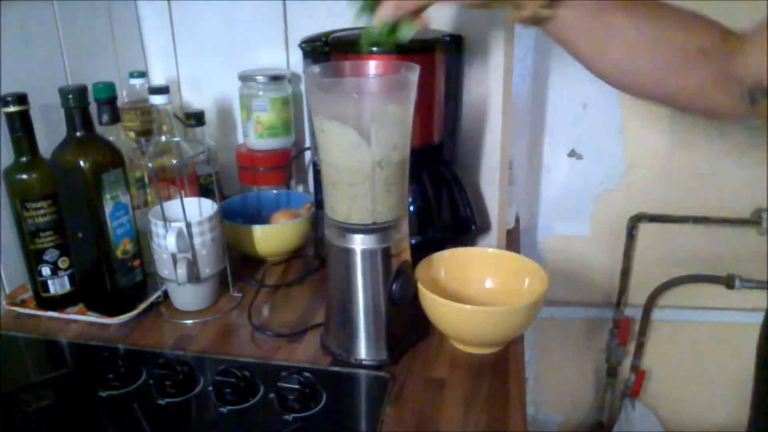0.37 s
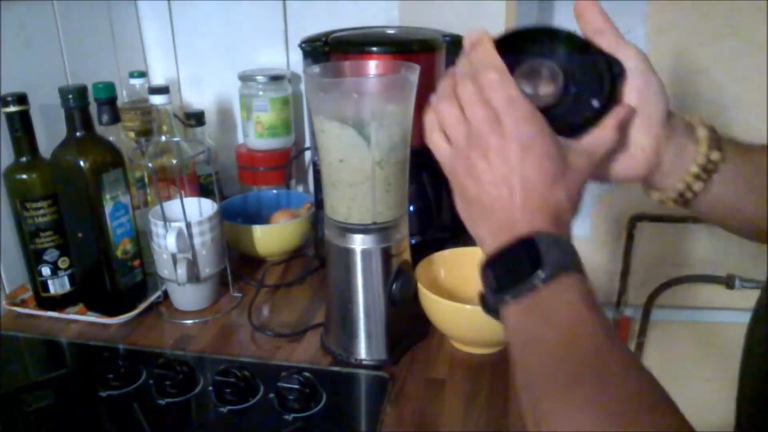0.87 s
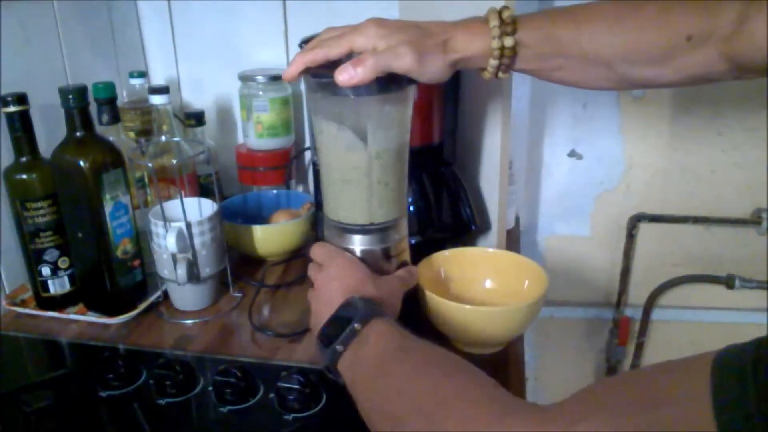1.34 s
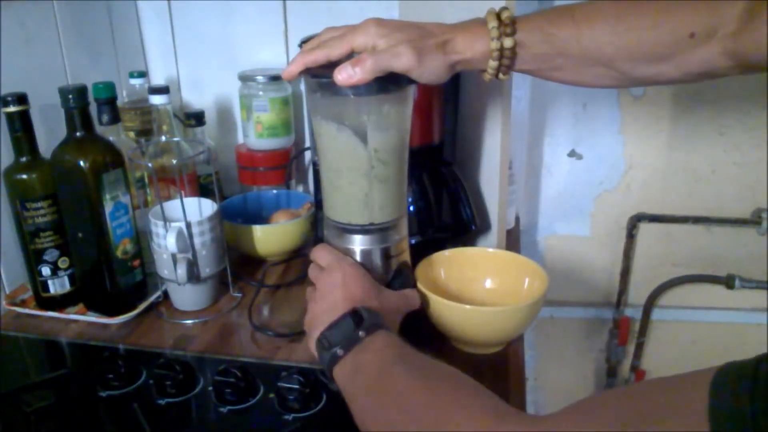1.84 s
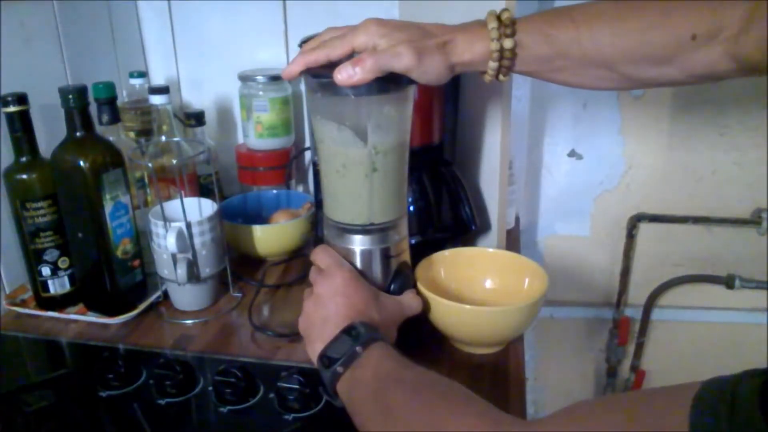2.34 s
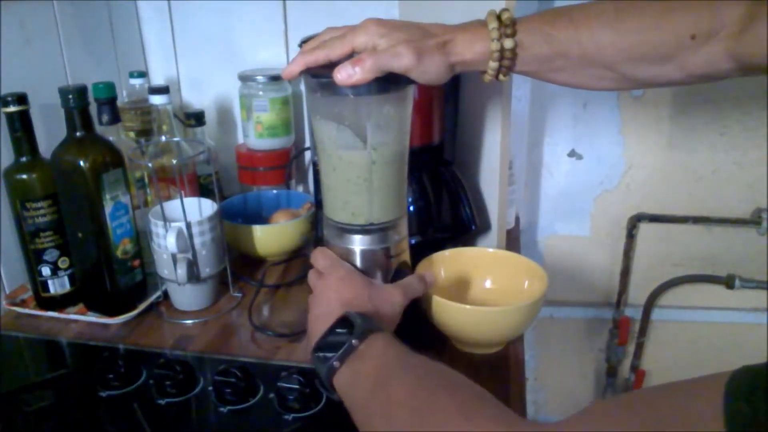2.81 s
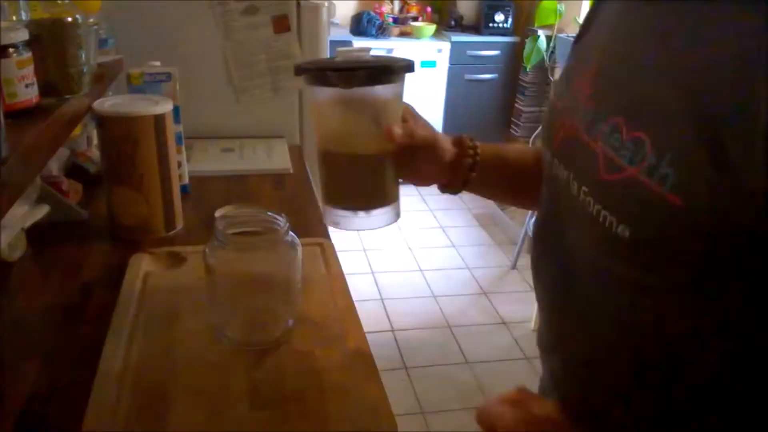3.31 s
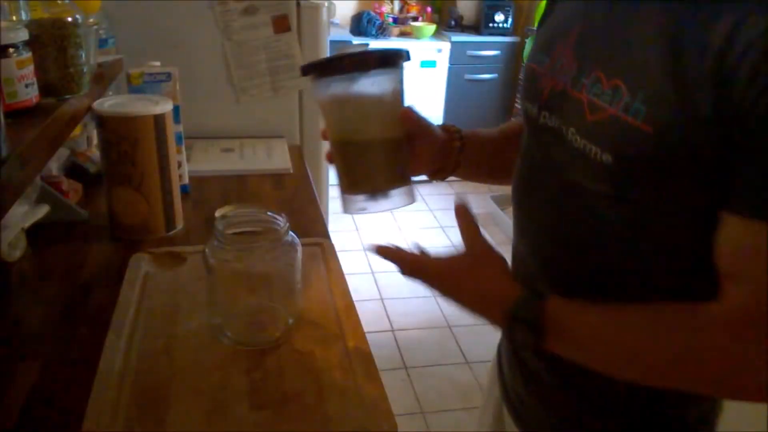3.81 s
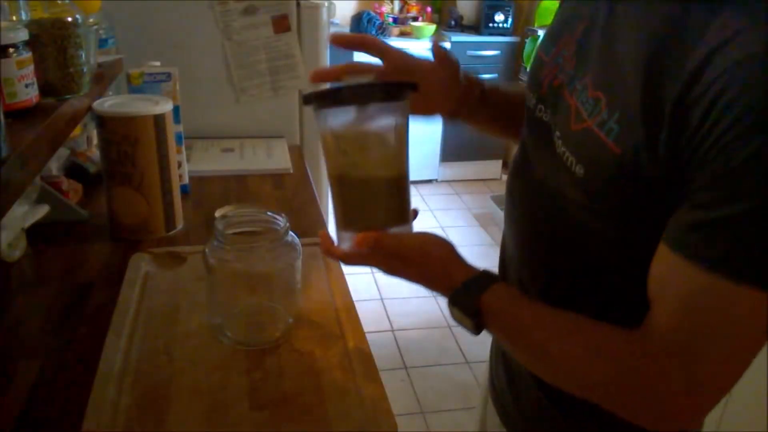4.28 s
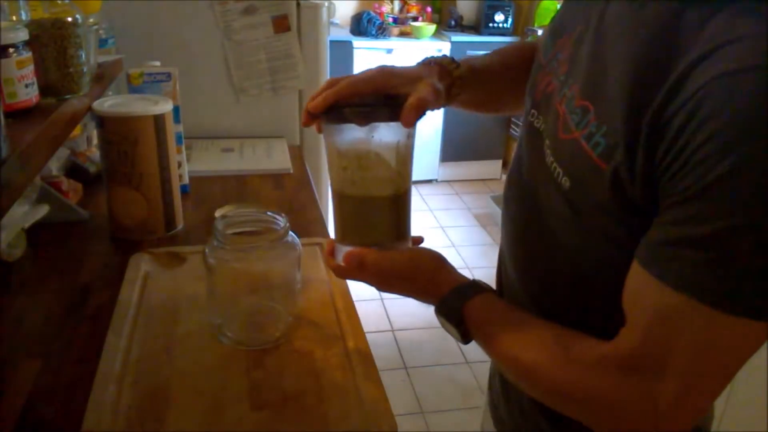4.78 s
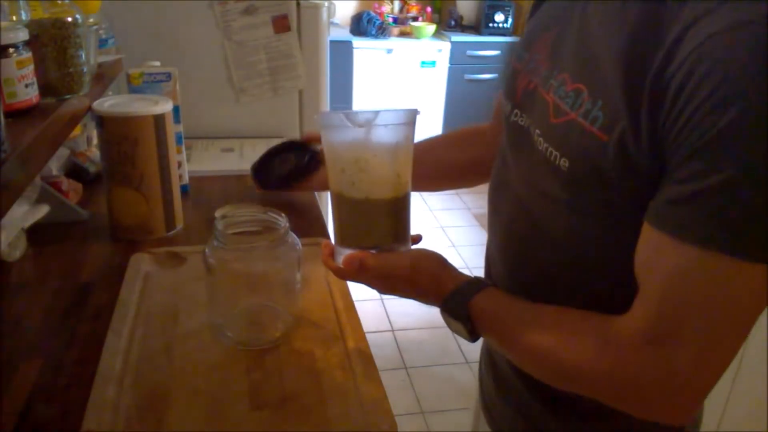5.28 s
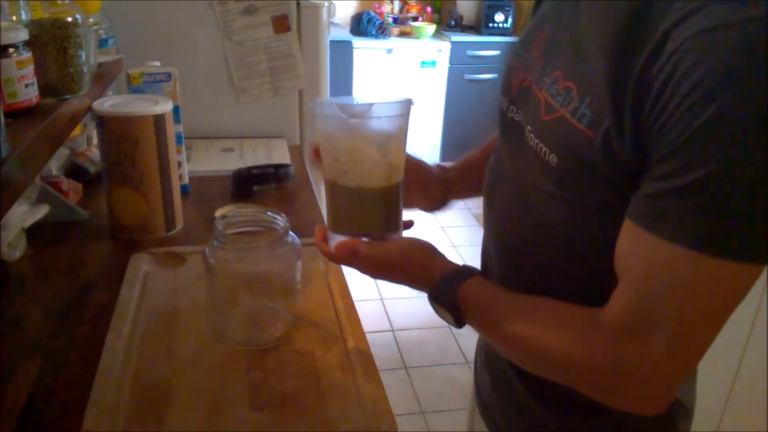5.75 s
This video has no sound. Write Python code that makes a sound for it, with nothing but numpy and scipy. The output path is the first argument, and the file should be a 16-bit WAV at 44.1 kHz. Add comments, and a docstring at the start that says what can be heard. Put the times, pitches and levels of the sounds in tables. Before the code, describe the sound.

Close in a kitchen with a faint refrigerator hum, small nuts tick into a plastic blender jar and its lid claps on hard. The motor roars in a half-second burst, then a longer one with a buzzing whine that sags away. Small clicks follow. After a brief dip to silence, over low rumble, the cup is handled softly, its lid popped off and knocked down on the counter.

```python
"""Small blender and its lid

Nuts drop into a small blender, the lid snaps on and the motor runs in two pulses: shaped noise for
the load, tones for the whirling blades. After a fade through silence, hands lift the plastic lid off
the cup and lay it on the counter. Each blow sets off ringing, a thud and a crack; rustling is grainy noise.
A refrigerator hums in the first part, a low rumble fills the second; both channels are the same.
"""
import sys
import numpy as np
from scipy import signal
from scipy.fft import rfft, irfft
from scipy.io import wavfile
from scipy.ndimage import uniform_filter1d

SR = 44100
rng = np.random.default_rng(int(sys.argv[2]) if len(sys.argv) > 2 else 0)


def volts_from_decibels(level):
    """Turn decibel levels (scalar or array-like) into linear amplitude factors."""
    exponent = np.asarray(level, float) / 20
    return 10 ** exponent


def int16_out(signal):
    """Quantize to a 16-bit WAV file."""
    q = np.round(np.clip(np.atleast_2d(signal).T, -1, 1) * 32767)
    wavfile.write(sys.argv[1], SR, q.astype(np.int16))


N = 259308  # length in samples

# Levels below are those before the fade. Noise colours are relative: their noise is scaled to rms 1.
# refrigerator hum lines: pitch_hz, level_db (rms, before wavering)
HUM = [(86.1, -75.5), (107.7, -67), (188.4, -64)]
# colour of the air in the first part: pitch_hz, level_db (per Hz)
AIR = [(12, -58), (20, -26.5), (42, -24), (85, -6.5), (197, -8), (455, -19), (523, -26.5), (794, -21),
       (965, -27.5), (1050, -22), (1430, -32), (2230, -30), (5000, -41.5), (15700, -40)]
# colour of the rumble in the second part: pitch_hz, level_db (per Hz)
RUMBLE = [(12, -26), (20, -3.5), (59, 9.5), (76, -8.5), (186, -13.5), (253, -16), (481, -23), (1110, -25),
          (1690, -40.5), (2230, -36.5), (3890, -38.5), (5290, -28), (9240, -42), (14000, -37.5),
          (15700, -77)]
# sleeve, skin and nuts rustling in soft swells: middle_s, length_s, level_db
RUSTLE = [(.42, 0.14, -74), (0.763, 0.03, -77), (3.521, 0.053, -73.5), (3.922, 0.23, -83),
          (4.088, 0.068, -68), (5.358, 0.15, -87)]
# blows on jar, cup and lid (1.284 s is the button's click): start_s, level_db, struck_hz (pitch struck most), #
# thud_db and crack_db (both over level_db)
JAR_BLOWS = [(0.243, -37, 1090, -25, -31), (0.25, -28, 7200, -27, -3), (0.331, -56.5, 1100, -8, -18),
             (0.596, -45, 990, -12, -36), (0.598, -49, 3360, -15, -37), (0.876, -38, 4700, -23, -3.5),
             (0.927, -52, 4620, -17, -5), (1.081, -19.5, 2600, -29, -9), (1.087, -15, 2260, -31, -18.5),
             (1.112, -23, 2500, -22.5, -17.5), (1.127, -15, 1700, -28.5, -15),
             (1.131, -12, 1376, -23.5, -12), (1.19, -39, 1880, -17, -20), (1.21, -27.5, 6600, -10.5, 0.5),
             (1.211, -34.5, 2300, -13, -22), (1.284, -41, 2500, -8.5, -9), (3.046, -58, 3880, -11.5, -9.5),
             (3.107, -58.5, 2500, -6, -14), (3.162, -53, 2500, -9, -11), (3.193, -51.5, 1032, -10, -18.5),
             (3.325, -46, 1840, -4, -9.5)]
CUP_BLOWS = [(3.587, -57, 1080, -14, -35), (3.723, -63, 396, 4, -32), (4.491, -53.5, 600, -2.5, -24),
             (4.512, -56, 781, 2, -16.5), (4.536, -43.5, 538, 0.5, -26), (4.598, -42.5, 770, -16, -19),
             (4.612, -34, 814, -21, -8.5), (4.825, -69, 300, 6, -20), (4.908, -46, 474, -18, -24.5),
             (4.963, -45.5, 640, -14, -27.5)]
LID_BLOWS = [(5.399, -35, 2000, -12, -20.5), (5.42, -27.5, 1480, -20, -21.5),
             (5.574, -19, 1650, -26.5, -24.5), (5.585, -26, 1670, -17, -14.5), (5.594, -22, 1610, -30, -23),
             (5.606, -27.5, 1620, -14, -18.5), (5.663, -29.5, 930, -18, -24),
             (5.678, -26, 1610, -20.5, -27.5), (5.736, -45.5, 1900, -1, -33), (5.755, -47.5, 1870, 0, -41)]
# ways each part can ring: pitch_hz, width_hz (at least a ninth of the pitch is used), level_db (relative)
JAR = [(720, 120, -2), (1080, 120, 0), (1335, 150, 2), (2300, 250, 0), (2600, 290, 0), (3600, 400, -1),
       (4350, 300, 2), (6500, 720, -2), (8200, 900, -3)]
CUP = [(478, 52, 9.5), (567, 220, 14), (709, 370, 10.5), (1006, 420, 6.5), (1438, 1600, 10.5),
       (1970, 150, 3), (2500, 300, -12)]
LID = [(500, 330, 10), (700, 760, 12), (1280, 190, 2.5), (1514, 495, 13), (1864, 190, 7.5), (2017, 380, 6),
       (2500, 480, 12), (2860, 250, 2.5), (4200, 460, 1)]
# what each blow shakes underneath: pitch_hz, level_db (relative)
JAR_THUD = [(180, -4.5), (430, -3)]
CUP_THUD = [(150, 2.5), (230, -5)]
LID_THUD = [(76, -2), (260, -8)]
# each press of the button jolts the resting load: start_s, peak_db (load level)
JOLTS = [(1.299, -15), (1.797, -10.5)]
# the load churning after each jolt, one list a pulse: time_s, load_db, boom_db (over the load)
CHURN = [
    [(1.361, -26, -10), (1.368, -19, -16.5), (1.418, -29.5, -2.5), (1.45, -22.5, -3), (1.48, -22.5, 2.5),
     (1.522, -23.5, -8), (1.758, -23.5, -6.5), (1.788, -47.5, 2), (1.8, -45, -4)],
    [(1.84, -30.5, -10), (1.895, -17, -11), (1.916, -23, -14), (1.95, -22, -8), (2.11, -25, -7.5),
     (2.488, -25, -6.5), (2.806, -26.5, -9), (2.844, -43, -5), (2.866, -48, 13.5), (2.88, -78, 8)],
]
# colour of the roar and its boom: pitch_hz, level_db (per Hz)
ROAR = [(140, -49), (230, -19.5), (292, -26), (398, 0), (469, -1.5), (544, -1), (915, -18), (1330, -7),
        (1950, -8.5), (2510, -2.5), (2830, -10.5), (4100, -7.5), (4900, -9), (5690, -20.5), (8000, -24),
        (10400, -40), (17600, -120)]
# colour of the fine spray: pitch_hz, level_db (per Hz)
SPRAY = [(3240, -29), (5500, -5.5), (5870, -5), (6880, -2), (7410, -4.5), (7990, -2), (8610, -3.5),
         (12200, -5), (13300, -4.5), (15700, -6)]
# the churning noise thins briefly: middle_s, length_s, level_db
THINS = [(2.072, .027, -20), (2.648, .027, -20)]
# pitch of the passing blades at full speed, sagging with the load: time_s, pitch_hz
WHINE = [(1.94, 570.1), (1.952, 593.2), (1.982, 604.1), (2.004, 681.4), (2.054, 634.0), (2.08, 678.2),
         (2.124, 643.4), (2.138, 657.7), (2.184, 627.8), (2.218, 682.2), (2.394, 638.3), (2.422, 654.5),
         (2.456, 640.8), (2.584, 673.1), (2.616, 652.6), (2.682, 666.6), (2.738, 656.4), (2.815, 685.5)]
# tones above and including the blade pitch: multiple, level_db (over the whine)
OVERTONES = [(1, 0), (2, -4), (3, 1.5), (4, -9), (5, -10), (6, -5), (7, -5.5), (8, -5.5)]
# housing that sings at full speed: pitch_hz, width_hz, level_db (over the whine, 3 dB added later)
HOUSING = [(4066, 120, -3.5), (4735, 130, -7), (5344, 90, -11), (6830, 400, -7.5), (7750, 80, -14),
           (13400, 800, -8)]
# motor tones of steady average pitch: pitch_hz, level_db (rms, before wavering)
BUZZ = [(2399, -52), (2800, -55.5), (3199, -48), (4750, -50), (5240, -45)]
# fade through silence: time_s, level_db
FADE = [(3.332, -1), (3.36, -27.5), (3.375, -58), (3.385, -57.5), (3.42, -7), (3.499, 2)]


def evened(x):
    """Scales to rms 1."""
    return x / np.sqrt(np.mean(x ** 2) + 1e-20)


def read(points, hz):
    """Reads a spectrum on a log-frequency axis."""
    f, value = np.transpose(points)
    return np.interp(np.log(hz + 1), np.log(f + 1), value)


def add(mix, s, sound):
    """Mixes a sound in from time s."""
    part = mix[round(s * SR):][:len(sound)]
    part += sound[:len(part)]


def band(x, low_hz, high_hz, order=2):
    """Keeps the pitches between two edges."""
    edges = [low_hz, min(high_hz, SR / 2 - 2000)]
    return signal.sosfilt(signal.butter(order, edges, "band", fs=SR, output="sos"), x)


def resonate(x, hz, width):
    """Rings at one pitch, with gain 1 there; a wider resonance dies sooner."""
    return signal.lfilter(*signal.iirpeak(hz, hz / width, SR), x)


def slow(size, seconds):
    """Smooth random wavering of rms 1."""
    span = int(seconds * SR)
    once = uniform_filter1d(rng.standard_normal(size), span)
    return evened(uniform_filter1d(once, span))


def noise(colour_db, patchy_db, size=1024):
    """Noise of a given colour, built from short random spectra with drifting patches."""
    hz = np.fft.rfftfreq(size, 1 / SR)
    a, b, patches = rng.standard_normal((N * 4 // size + 5, len(hz), 3)).T
    patches = uniform_filter1d(patches, 9, 0)  # smooth over pitch
    patches = evened(uniform_filter1d(patches, 7, 1))  # smooth over time
    spectra = (a + 1j * b) * volts_from_decibels(colour_db(hz)[:, None] + patchy_db * patches)
    sound = signal.istft(spectra, nperseg=size, noverlap=size - size // 4)[1]
    return evened(sound[:N])


def fridge():
    """Steady compressor tones that waver in strength and timing, over the noise of the room air."""
    t = np.arange(N) / SR
    lines = np.zeros(N)
    for hz, db in HUM:
        turns = hz * t + 0.06 * slow(N, 0.08)
        lines += volts_from_decibels(db + 0.89 * slow(N, 0.074)) * np.sin(2 * np.pi * turns)
    air = noise(lambda hz: read(AIR, hz), patchy_db=3.0, size=2048)
    return np.sqrt(2) * lines + volts_from_decibels(-64.5) * air


def rustle():
    """Soft friction noise with a fine grain: swells over a faint steady rub."""
    t = np.arange(N) / SR
    rub_db = -82
    level = volts_from_decibels(rub_db)
    for s, length, db in RUSTLE:
        level = level + volts_from_decibels(db) * np.exp(-(2 * (t - s) / length) ** 2)
    grain = volts_from_decibels(2.5 * slow(N, 0.002))
    return level * evened(band(rng.standard_normal(N), 980, 4700) * grain)


def blow(row, modes, thuds, t60, top_hz, hit_s, room_db, room_hz, spread_db, tick_db, clatter_db):
    """A short contact and its duller room echoes drive the ringing near the pitch struck, a thud and a crack."""
    s, level_db, struck_hz, thud_db, crack_db = row
    t = np.arange(SR // 2) / SR
    a, b, c, d = rng.standard_normal((4, len(t)))
    contact = np.exp(-t / hit_s)
    fall_db = -60 * t / max(t60, 0.01)  # echoes lose 60 dB in t60 seconds
    echo = volts_from_decibels(room_db + fall_db)
    drive = a * contact + band(d, 300, room_hz, order=4) * echo

    ring = np.zeros(len(t))
    for hz, width, db in modes:
        width = max(width, hz / 9)  # plastic damps every mode
        near_db = db - spread_db * np.log2(hz / struck_hz) ** 2  # weaker away from the pitch struck
        ring += volts_from_decibels(near_db) * resonate(resonate(drive, hz, width), hz, width) * np.sqrt(1000 / width)
    body = ring / abs(ring).max() + volts_from_decibels(clatter_db) * drive
    # a soft blow reaches only modes near its own pitch
    body = band(body, struck_hz / 4, struck_hz * 3.2, order=3)

    shaken = evened(sum(volts_from_decibels(db) * resonate(resonate(b, hz, hz / 2), hz, hz / 2) for hz, db in thuds))
    thud = shaken * volts_from_decibels(thud_db) * (np.exp(-t / (3 * hit_s)) + echo)

    tick = volts_from_decibels(tick_db + fall_db) * band(c, 7500, 16500)
    treble = evened(band(c, 2800, top_hz, order=4)) + tick
    crack = treble * volts_from_decibels(crack_db) * (contact + echo)
    return s, volts_from_decibels(level_db) * (body + thud + crack)


def jar_blow(row):
    """A blow on the jar, or the click of the button just before the motor starts: short contact, bright crack
    and ringing close to the pitch struck."""
    return blow(row, JAR, JAR_THUD, t60=0.073, top_hz=13000, hit_s=0.0036, room_db=-9.5, room_hz=8050,
                spread_db=22, tick_db=-6.5, clatter_db=-15)


def thinning(t):
    """Gain of the brief dips in the churning noise."""
    return volts_from_decibels(sum(db * np.exp(-(2 * (t - at) / length) ** 6) for at, length, db in THINS))


def churn():
    """Liquid and pieces thrown round the jar: roar, a boomy air cavity, fine spray, the base shaking."""
    jolt_start_db, jolt_rise_s, jolt_fall_db_per_s = -12, 0.027, 619
    jolt_boom_db, jolt_spray_db, jolt_shake_db = -11.5, -13.5, -36  # over the jolt
    # over the load, one end value a pulse: spray grows as the load is flung higher,
    # the base shakes less once the blades turn freely
    spray_from_db, spray_to_db = -13, [-5.5, -2]
    shake_from_db, shake_to_db = -16.5, [-25.5, -29]
    settle_s = 0.13
    # spray loses this much more for every dB that the load sinks under churning_db
    churning_db, coast_spray_share = -28, 0.51

    t = np.arange(N) / SR
    grit = volts_from_decibels(0.76 * slow(N, 0.0011))  # pieces striking blades and wall make the noise lumpy
    full = rfft(noise(lambda hz: read(ROAR, hz), patchy_db=3.0) * grit)
    low = 1 / (1 + (np.fft.rfftfreq(N, 1 / SR) / 800) ** 8)  # boom below 800 Hz, roar above
    boom = evened(irfft(full * low, N))
    roar = evened(irfft(full * (1 - low), N))
    spray = noise(lambda hz: read(SPRAY, hz), patchy_db=2.0)
    shake = evened(band(rng.standard_normal(N), 150, 210))

    out = np.zeros(N)
    for (on, jolt_db), rows, spray_end_db, shake_end_db in zip(JOLTS, CHURN, spray_to_db, shake_to_db):
        since = np.maximum(t - on, 0)
        rise_db = jolt_start_db * (1 - since / jolt_rise_s)
        drop_db = -jolt_fall_db_per_s * (since - jolt_rise_s)
        kick = (t > on) * volts_from_decibels(jolt_db + np.minimum(rise_db, drop_db))

        s, row_load_db, row_boom_db = np.transpose(rows)
        load_db = np.interp(t, s, row_load_db, -150, -150)
        load = volts_from_decibels(load_db)
        fresh = np.exp(-since / settle_s)  # fades from 1 as the load settles
        coast_db = coast_spray_share * np.minimum(load_db - churning_db, 0)
        boom_db = np.interp(t, s, row_boom_db)
        spray_db = coast_db + spray_end_db + (spray_from_db - spray_end_db) * fresh
        shake_db = shake_end_db + (shake_from_db - shake_end_db) * fresh

        # hypot joins jolt and load by power
        out += np.hypot(kick, load) * volts_from_decibels(-3.5) * roar
        out += np.hypot(kick * volts_from_decibels(jolt_boom_db), load * volts_from_decibels(boom_db)) * boom
        out += np.hypot(kick * volts_from_decibels(jolt_spray_db), load * volts_from_decibels(spray_db)) * spray
        out += np.hypot(kick * volts_from_decibels(jolt_shake_db), load * volts_from_decibels(shake_db)) * shake
    return out * thinning(t)


def whine():
    """Blade tone and overtones, shaken and blurred by the uneven load, with singing housing and motor buzz."""
    whine_db, edge_s = -33, 0.02
    s, speed_hz = np.transpose(WHINE)
    t = np.arange(s[0], s[-1], 1 / SR)
    size = len(t)
    shaking = 1 + 0.003 * slow(size, 0.004) + 0.006 * slow(size, 0.014)
    turns = np.cumsum(np.interp(t, s, speed_hz) * shaking) / SR

    tones = np.zeros(size)
    for k, db in OVERTONES:
        slip = 0.0003 * k ** 2 * slow(size, 0.003)  # blurs high overtones most
        tones += volts_from_decibels(db + 2.0 * slow(size, 0.016)) * np.sin(2 * np.pi * k * (turns + slip))

    air = rng.standard_normal(size)
    for hz, width, db in HOUSING:
        tones += volts_from_decibels(db) * evened(resonate(resonate(air, hz, width), hz, width))

    buzz = np.zeros(size)
    for hz, db in BUZZ:
        buzz_turns = hz * t + 0.04 * slow(size, 0.13)
        buzz += volts_from_decibels(db + 6.9 * slow(size, 0.03)) * np.sin(2 * np.pi * buzz_turns)

    edges = signal.windows.tukey(size, 2 * edge_s / (s[-1] - s[0]))
    return s[0], np.sqrt(2) * (volts_from_decibels(whine_db) * tones + buzz) * edges


def drone():
    """A single low tone that swells, then fades while its pitch sinks steadily throughout."""
    start_s, peak_s, peak_db = 2.66, 2.79, -45.5
    swell_db_per_s, fall_db_per_s = 59.5, 152.5
    start_hz, sag_hz_per_s = 248, 40
    t = np.arange(SR // 2) / SR
    past = t + start_s - peak_s
    level_db = peak_db + np.minimum(swell_db_per_s * past, -fall_db_per_s * past)
    turns = start_hz * t - sag_hz_per_s * t ** 2 / 2
    tone = np.sin(2 * np.pi * turns) * signal.windows.tukey(len(t), 0.1)
    return start_s, np.sqrt(2) * volts_from_decibels(level_db) * tone


def second_room():
    """Low rumble of the quieter room, as patchy coloured noise."""
    return volts_from_decibels(-64) * noise(lambda hz: read(RUMBLE, hz), patchy_db=3.0, size=2048)


def cup_blow(row):
    """A blow on the cup: broad low ringing with strong, dull echoes."""
    return blow(row, CUP, CUP_THUD, t60=0.19, top_hz=7460, hit_s=0.004, room_db=2.5, room_hz=3035,
                spread_db=8, tick_db=-14.5, clatter_db=-10.0)


def lid_blow(row):
    """A blow of the lid: longer contact, broad ringing and the longest echoes."""
    return blow(row, LID, LID_THUD, t60=0.22, top_hz=6040, hit_s=0.0063, room_db=1.5, room_hz=3000,
                spread_db=6.5, tick_db=-10.0, clatter_db=-40)


def scene():
    """Both parts, each with its own background, on two equal channels."""
    second_part_s = 3.38
    background = np.where(np.arange(N) < second_part_s * SR, fridge(), second_room())
    mix = background + rustle() + churn()
    add(mix, *whine())
    add(mix, *drone())
    for row in JAR_BLOWS:
        add(mix, *jar_blow(row))
    for row in CUP_BLOWS:
        add(mix, *cup_blow(row))
    for row in LID_BLOWS:
        add(mix, *lid_blow(row))
    return np.array([mix, mix])


def low_pass(x):
    """Removes everything above the highest recorded frequency."""
    return signal.sosfilt(signal.butter(12, 16860, fs=SR, output="sos"), x)


def record(dry):
    """Removes the highest treble and fades through silence between the parts."""
    edge = signal.firwin(255, 15850, window=("kaiser", 8), fs=SR)  # keeps what lies below 15850 Hz
    limited = signal.oaconvolve(dry, edge[None], "same")
    s, db = np.transpose(FADE)
    finished = limited * volts_from_decibels(np.interp(np.arange(N) / SR, s, db))
    return low_pass(finished)


dry = scene()
out = record(dry)
int16_out(out)
```